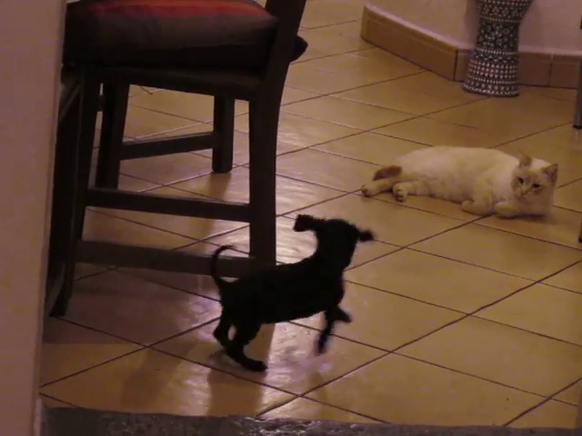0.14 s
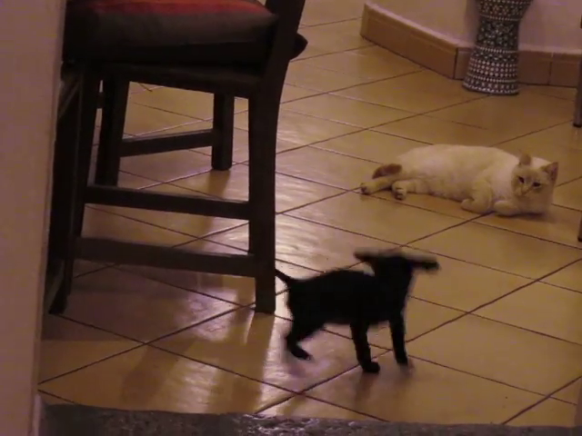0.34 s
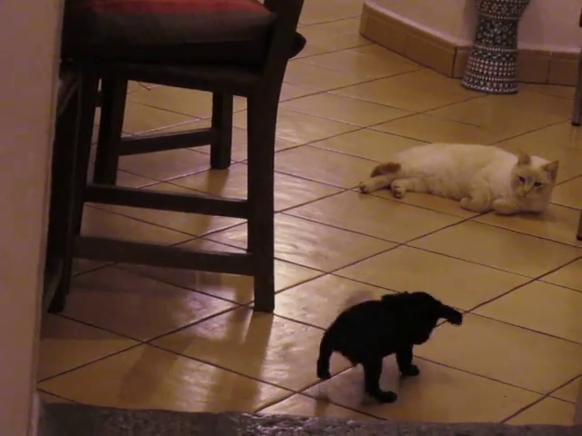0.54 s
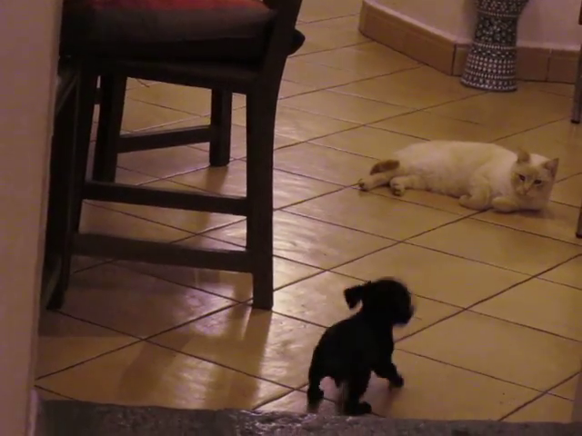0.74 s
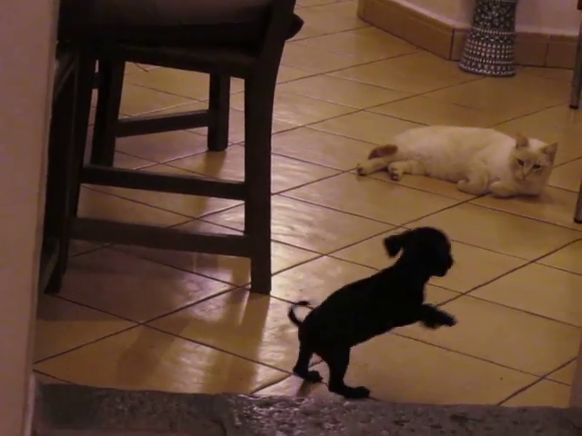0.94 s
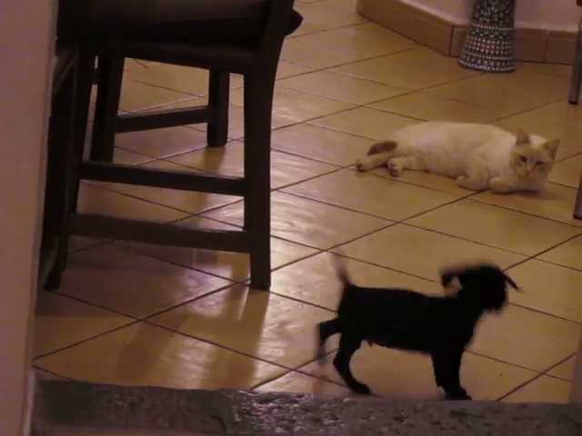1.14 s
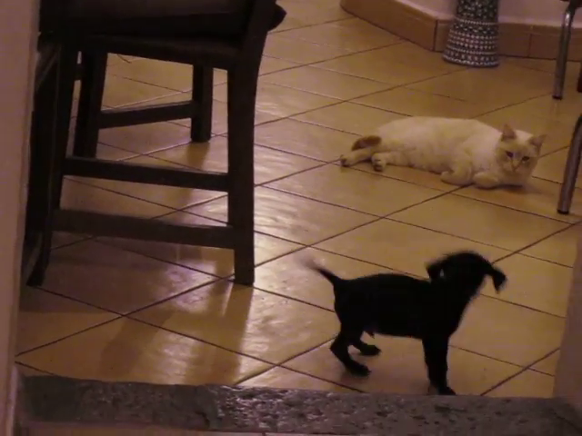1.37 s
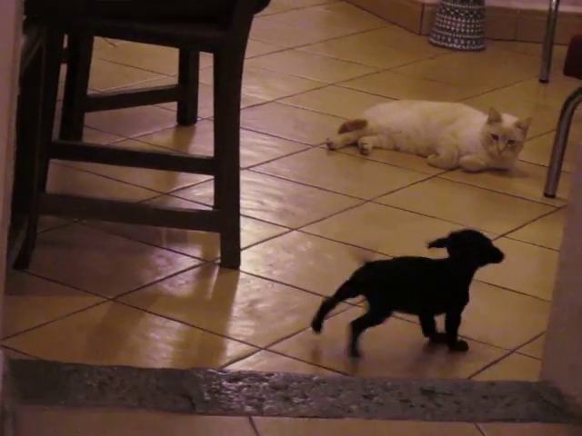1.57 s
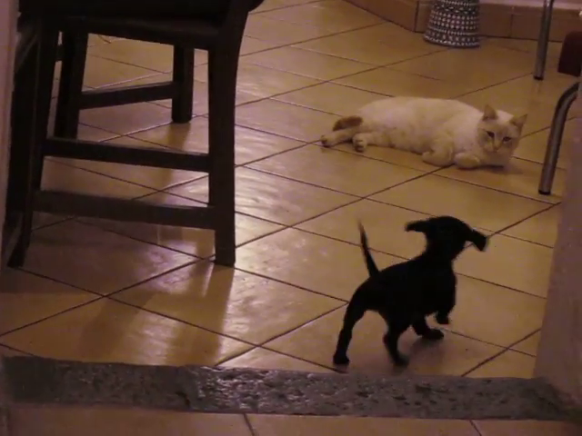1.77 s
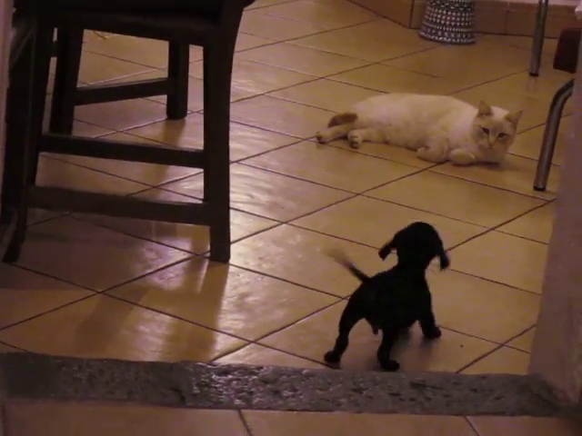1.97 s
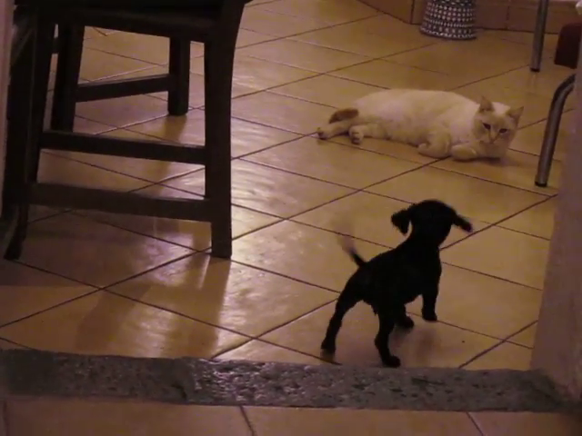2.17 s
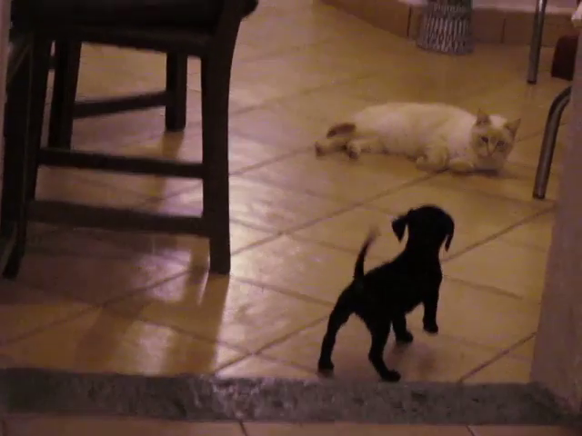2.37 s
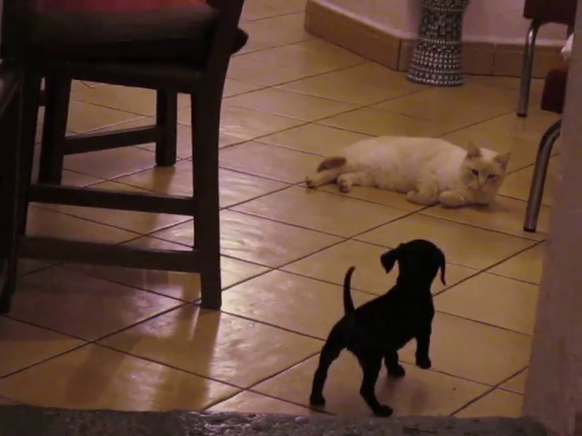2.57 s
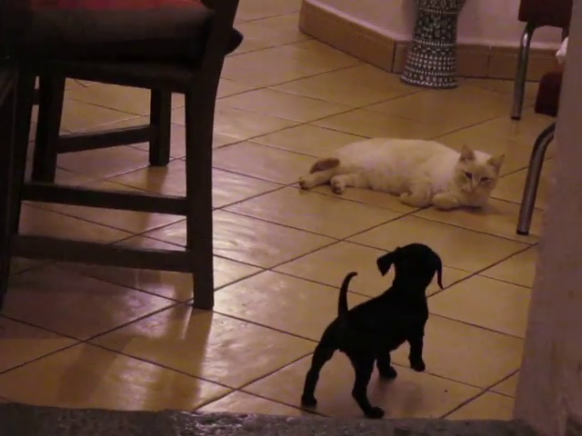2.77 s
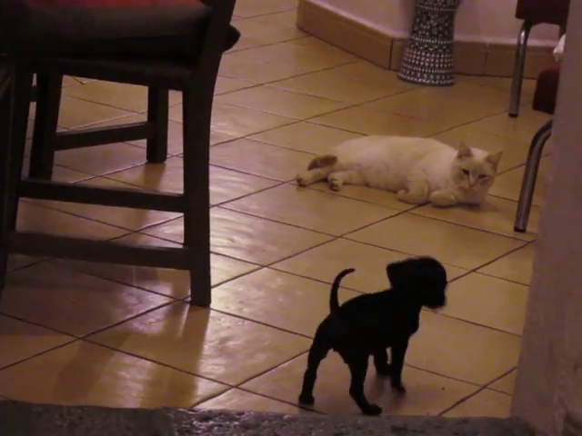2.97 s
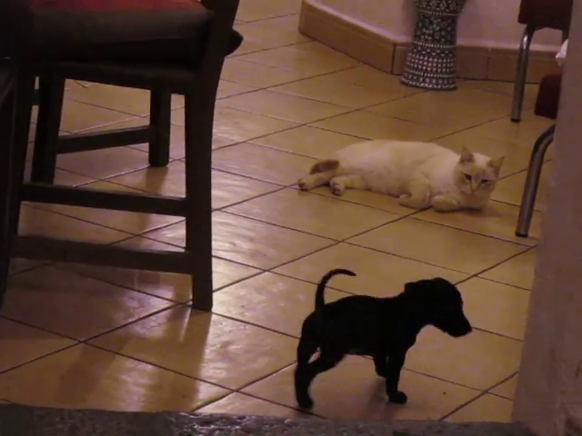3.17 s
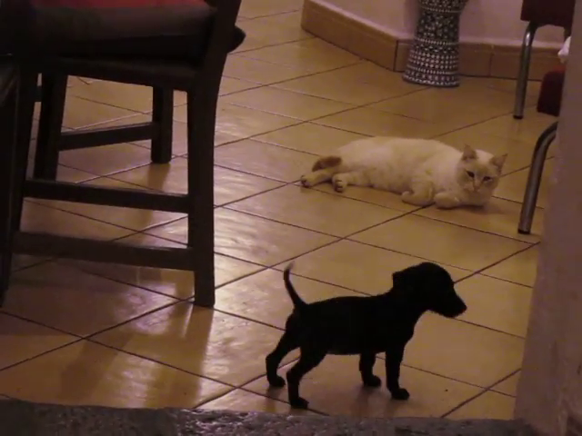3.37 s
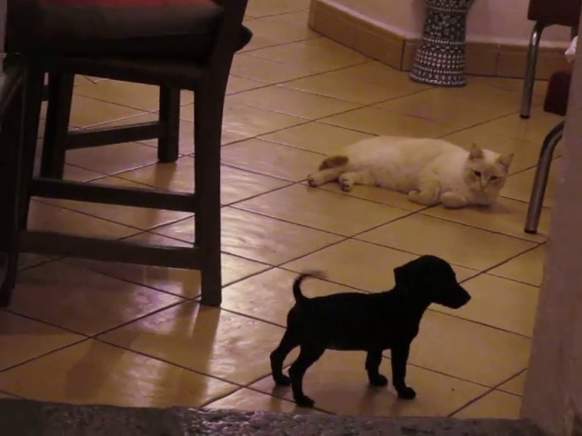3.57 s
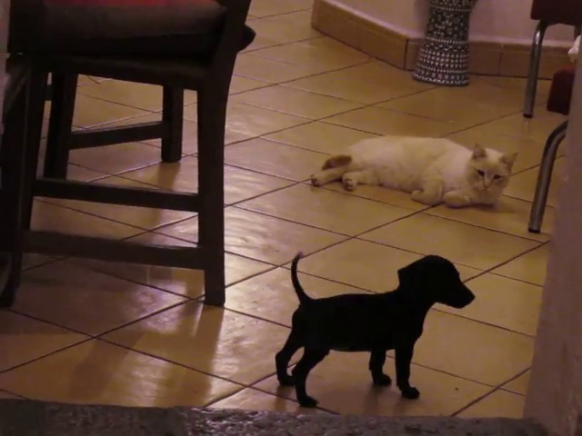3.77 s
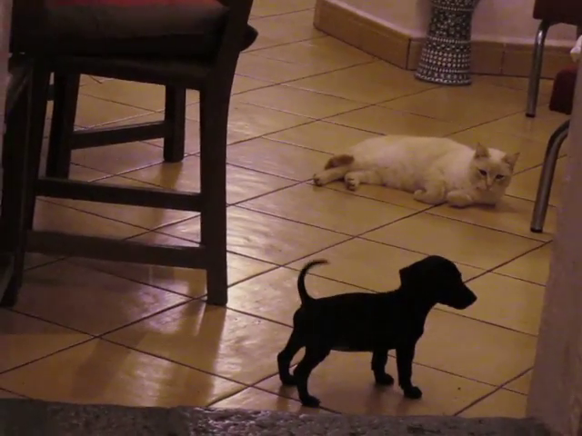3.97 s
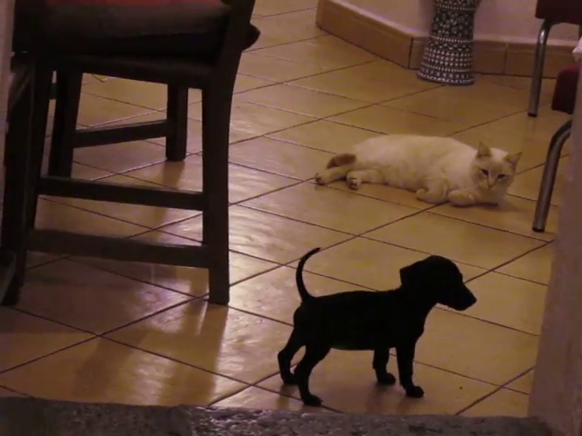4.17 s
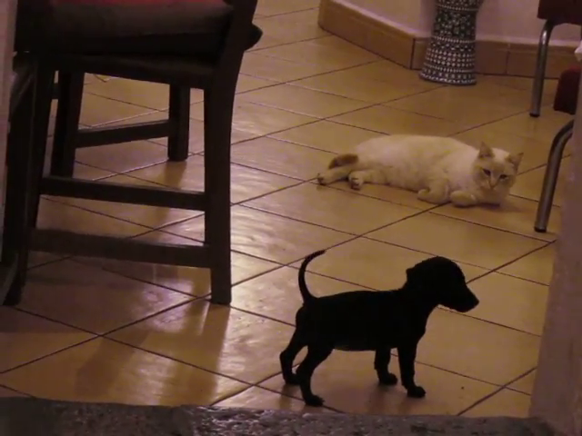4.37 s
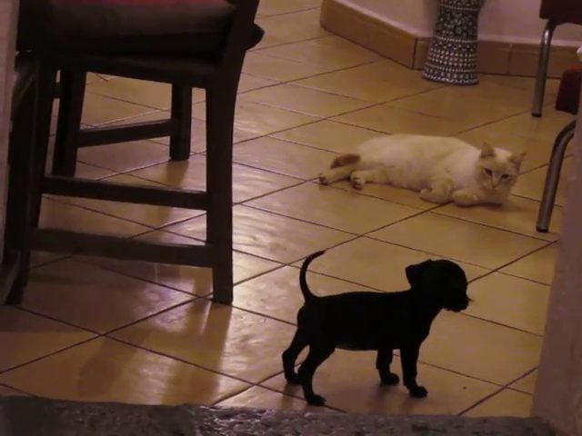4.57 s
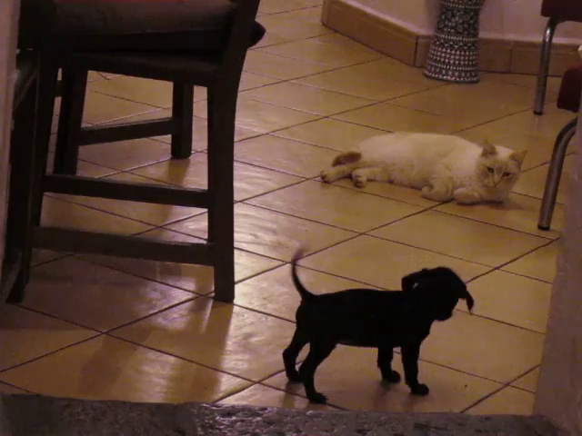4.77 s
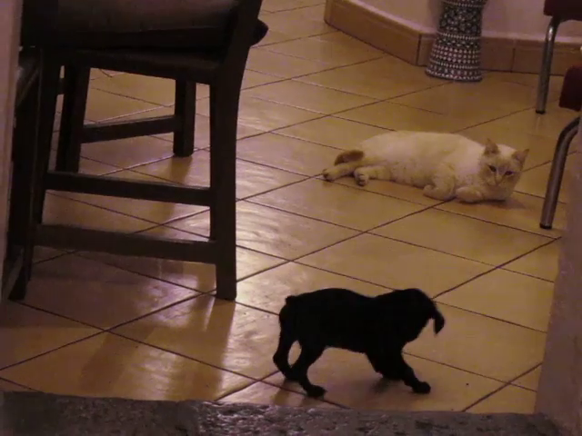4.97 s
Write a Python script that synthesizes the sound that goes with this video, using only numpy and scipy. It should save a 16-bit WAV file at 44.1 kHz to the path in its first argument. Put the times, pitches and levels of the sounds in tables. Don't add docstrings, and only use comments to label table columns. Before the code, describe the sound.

A small puppy growls and gives three sharp, squeaky yaps in an echoing tiled room, then growls low and quietly, with hiss behind.

```python
import sys
import numpy as np
from scipy import signal
from scipy.fft import rfft, irfft
from scipy.io import wavfile
from scipy.ndimage import uniform_filter1d, map_coordinates

SR = 44100
rng = np.random.default_rng(int(sys.argv[2]) if len(sys.argv) > 2 else 0)


def field_ratio(decibels):
    return 10 ** (np.asarray(decibels, dtype=float) / 20)


def persist_wave(psi):
    counts = np.round(np.clip(psi, -1, 1) * 32767).astype(np.int16)
    wavfile.write(sys.argv[1], SR, np.atleast_2d(counts).T)


N = 220913

# (f/Hz, level/dB)
MUZZLE_TONE = [(80, -45), (150, -16), (230, -9), (380, -2), (600, 0), (800, -12), (950, -13), (1100, -22),
               (1400, -15), (1750, -34), (3000, -45), (7500, -40), (12000, -55)]


def unit(x):
    return x / np.sqrt(np.mean(x ** 2) + 1e-20)


def along(points, hz):
    f, v = np.transpose(points)
    return np.interp(np.log(hz + 1), np.log(f + 1), v)


def curves(rows):
    s, *columns = np.transpose(rows)
    return [np.interp(np.arange(N) / SR, s, column) for column in columns]


def wobble(rate):
    knots = rng.standard_normal(int(N * rate / SR) + 4)
    return map_coordinates(knots, [np.arange(N) * rate / SR])


def colour(x, spectrum):
    size = 4096
    cepstrum = irfft(np.log(field_ratio(along(spectrum, np.fft.rfftfreq(size, 1 / SR)))), size)
    cepstrum[1:size // 2] *= 2
    cepstrum[size // 2 + 1:] = 0
    kernel = irfft(np.exp(rfft(cepstrum)), size)
    return signal.fftconvolve(x, kernel / np.linalg.norm(kernel))[:len(x)]


def noise(spectrum):
    return unit(colour(rng.standard_normal(N), spectrum))


def room(x, wet_db):
    # (f/Hz, t60/s)
    decay = [(200, 0.56), (500, 0.81), (1100, 0.76), (2300, 0.67), (5000, 0.6), (9000, .56), (12000, .52),
             (15000, 0.45)]
    hz, t, bins = signal.stft(rng.standard_normal(SR), SR, nperseg=256)
    fading = bins * field_ratio(-60 * t / along(decay, hz)[:, None])
    tail = signal.istft(fading, SR, nperseg=256)[1]
    tail *= np.clip(np.arange(len(tail)) / SR / 0.0076 - .3, 0, 1)
    answer = field_ratio(wet_db) * tail / np.linalg.norm(tail)
    answer[0] += 1
    answer[round(.0011 * SR)] += .4
    return signal.fftconvolve(x, answer)[:N]


def snort():
    # (f/Hz, level/dB per Hz)
    throat_tone = [(88, -20), (150, -10), (398, -0.5), (574, -3.5), (770, -2.5), (975, -12.5),
                   (2500, -20.5), (3250, -63), (5500, -120)]
    # (f/Hz, level/dB per Hz)
    nostril_tone = [(1470, -50.5), (2500, -19.5), (4010, -12), (4500, -10), (5160, -13), (8290, -6.5),
                    (10200, -17), (15500, -31)]
    t = np.arange(N) / SR
    throat_db = -37.5 - 111 * t + wobble(62)
    nose_db = -39.5 - 135 * t + 2.1 * wobble(72)
    return field_ratio(throat_db) * noise(throat_tone) + field_ratio(nose_db) * noise(nostril_tone)


def background():
    # (f/Hz, level/dB per Hz)
    hiss_tone = [(41, -30), (75, -5), (123, -5), (165, -5.5), (248, -2.5), (400, -10), (770, -9.5),
                 (1400, -13), (3000, -17), (5700, -21), (8500, -19), (10500, -25.5), (13000, -30.5),
                 (15600, -32.5)]
    # (f/Hz, level/dB per Hz)
    grip_tone = [(15, -30), (28, -11), (40, 0), (52, -4), (62, -15), (85, -19), (200, -55), (500, -110)]
    # (f/Hz, width/Hz, level/dB)
    whines = [(7780, 34, -73), (2505, 110, -71), (247.9, 43, -81.5)]
    # (t/s, half length/s, depth/dB)
    lulls = [(.9, .12, 4), (1.655, 0.29, 17), (2.7, 0.32, 2.5)]
    t = np.arange(N) / SR

    lines = np.zeros(N)
    for hz, width, db in whines:
        resonator = signal.iirpeak(hz, hz / width, SR)
        lines += field_ratio(db) * unit(signal.lfilter(*resonator, rng.standard_normal(N)))

    hum_db = -62.5 - 64 * np.abs(t - np.clip(t, 3.644, 4.3))
    hum_phase = 2 * np.pi * np.cumsum(121 + 7 * wobble(15)) / SR
    hum = field_ratio(hum_db + 2.36 * wobble(8)) * np.sin(hum_phase)

    lumps = field_ratio(1.5 * wobble(6))
    lull_db = sum(db * np.clip(1 - np.abs(t - s) / half, 0, 1) for s, half, db in lulls)
    rumble = field_ratio(-55.5 - lull_db) * lumps * noise(grip_tone)
    return field_ratio(-56.5) * noise(hiss_tone) + lines + hum + rumble


def claws():
    # (t/s, level/dB, centre f/Hz, t60/s)
    scratches = [(.355, -55, 1870, .02), (0.404, -53, 10000, .03), (.602, -46.5, 9550, 0.021),
                 (0.641, -55.5, 8480, 0.2), (.69, -54, 8310, .15), (1.735, -65, 10930, .01),
                 (3.225, -52, 9100, 0.013), (4.15, -57, 700, 0.016)]
    out, t = np.zeros(N), np.arange(SR // 10) / SR
    for s, db, hz, t60 in scratches:
        band = [(hz / 3, -30), (hz / 1.4, -6), (hz, 0), (hz * 1.5, -7), (hz * 3, -30)]
        scratch = colour(rng.standard_normal(len(t)), band)
        out[round(s * SR):][:len(t)] += field_ratio(db - 60 * t / t60) * scratch
    return room(out, wet_db=-4)


def folds(hz, share, jitter):
    # (f/Hz, level/dB)
    pulse_tone = [(100, -30), (170, 0), (3800, 0), (5500, -6), (15000, -10)]
    share = np.clip(share, 0, 1)
    phase = 2 * np.pi * np.cumsum(hz * (1 + jitter * share * wobble(180))) / SR
    count = np.floor(15000 / hz)
    pulses = np.sin((count + .5) * phase) / (2 * np.sin(phase / 2) + 1e-9) - .5
    pulses = colour(pulses * np.sqrt(2 / count), pulse_tone)
    pulses *= field_ratio((1 + 4 * share) * wobble(320))
    breath = rng.standard_normal(N) * (1 + .6 * np.cos(phase)) * 1.3
    return np.sqrt(1 - share) * pulses + np.sqrt(share) * breath


def sounding(rows):
    t = np.arange(N) / SR
    return (t >= rows[0][0]) & (t <= rows[-1][0])


def squeals(first, last):
    # (t/s, length/s, f/Hz, level/dB, level of the octave above/dB)
    notes_table = [(0.74, .035, 538, -15, -22), (0.807, 0.055, 1151, -9, -16.5),
                   (1.452, 0.043, 1027, -15, -27), (1.448, 0.039, 1195, -14, -13),
                   (1.503, 0.05, 1167, -18, 11.5), (1.999, 0.037, 1258, -12, -27),
                   (1.998, 0.025, 1058, -11.5, -23.5), (2.044, 0.078, 1058, -24.5, 14.5)]
    out, drift = np.zeros(N), wobble(90)
    for s, length, hz, db, octave_db in notes_table:
        if first <= s <= last:
            u = np.arange(round(length * SR)) / (length * SR)
            at = slice(round(s * SR), round(s * SR) + len(u))
            pitch = hz * (1 + .015 * (u - .5)) * (1 + .022 * drift[at])
            phase = 2 * np.pi * np.cumsum(pitch) / SR
            swell = np.sin(np.pi * u) ** .7 * field_ratio(1.5 * drift[at][::-1])
            upper = np.sin(2 * phase) + field_ratio(-13) * np.sin(3 * phase)
            upper += field_ratio(-24) * np.sin(4 * phase) + field_ratio(-23) * np.sin(5 * phase)
            out[at] += field_ratio(db - 0.5) * swell * (np.sin(phase) + field_ratio(octave_db) * upper)
    return out


def yap(times, effort_db, pitch_hz, clear, jaws, loudness):
    # (f/Hz, level/dB)
    half_tone = [(120, -23.5), (300, 10), (550, 17.5), (900, -4.5), (1300, 0), (3200, -10), (4300, -4),
                 (5800, -16.5), (7000, 1), (15000, -25)]
    # (f/Hz, level/dB)
    chest_tone = [(100, -15), (200, -31), (330, 11), (600, 3), (15000, 0)]
    # (f/Hz, level/dB)
    nose_tone = [(1500, -41), (2700, 1), (4000, -1), (4900, -14.5), (5900, -7.5), (7200, -16.5),
                 (9600, -4.5), (15500, -40.5)]
    # (f/Hz, level/dB)
    palate_tone = [(6000, 1.5), (7400, 2), (8800, 1), (9600, -7), (10400, 6.5), (11500, -4), (13500, 4),
                   (15500, -4)]
    start, part, snap, peak, stop = times
    shut_db, open_db, nose_db = loudness
    parting_noise, settled_noise = clear
    break_s, settle_s = .008, .018

    effort = [(start - .004, -70), *zip(times, effort_db), (stop + .022, -60)]
    db, = curves(effort)
    pitch_times = [start, snap - break_s / 2, snap + break_s / 2, peak, stop]
    hz, = curves(list(zip(pitch_times, pitch_hz)))
    share, = curves([(start, .68), (part, parting_noise), (snap - break_s, parting_noise), (snap, .8),
                     (snap + settle_s, settled_noise), (peak, settled_noise), (peak + settle_s, .58)])
    shake, = curves([(part, .16), (snap, .04)])
    source = field_ratio(db) * sounding(effort) * folds(hz, share, jitter=shake)

    opening, = curves([(part, 0), (snap + .008, 1)])
    shut = np.clip(1 - 2 * opening, 0, 1)
    wide = np.clip(2 * opening - 1, 0, 1) ** 1.2
    nose, = curves([(start, .1), (start + .029, 1)])
    chest, = curves([(part, 1), (snap - break_s, .5), (snap, 0)])

    muffled = field_ratio(shut_db) * colour(source * chest, MUZZLE_TONE)
    nasal = field_ratio(nose_db) * colour(source * shut * nose, nose_tone)
    half = colour(source * np.clip(1 - shut - wide, 0, 1), half_tone)
    mouth = half + colour(source * wide, chest_tone)
    bright = field_ratio(open_db) * colour(colour(mouth, jaws), palate_tone)
    return muffled + nasal + bright + squeals(start, stop)


def grunts():
    # (t/s, level/dB)
    catches = [
        (1.349, -46.5),
        (1.914, -43.5),
    ]
    t = np.arange(N) / SR
    envelope = sum((t >= s) * field_ratio(db - 60 * np.abs(t - s) / .19) for s, db in catches)
    return colour(envelope * folds(np.full(N, 255), .7, jitter=.07), MUZZLE_TONE)


def growl(rows):
    # (f/Hz, level/dB)
    shut_tone = [(80, -71.5), (150, 0), (250, 1), (380, 4), (540, 5.5), (800, -24.5), (1100, -40),
                 (1500, -50), (1900, -58), (3000, -37), (4200, -67), (8000, -30.5), (12000, -56)]
    # (f/Hz, level/dB)
    ajar_tone = [(100, -21), (250, -4.5), (550, -3), (900, -17), (1250, -26), (1600, -16.5), (2000, -33.5),
                 (2500, -35.5), (3200, -56), (4000, -33.5), (5000, -43), (12000, -106)]
    hz, db, opening = curves(rows)
    opening = np.clip(opening, 0, 1)
    share = np.clip(.34 + .025 * (-41 - db), .25, .75)
    source = field_ratio(db) * sounding(rows) * folds(hz, share, jitter=.2)
    return colour(source * (1 - opening), shut_tone) + colour(source * opening, ajar_tone)


def puppy():
    # (growl starts t/s, jaws part t/s, voice breaks upward t/s, peak t/s, breath runs out t/s)
    moments = [
        (.494, .72, .783, .81, .875),
        (1.372, 1.432, 1.443, 1.494, 1.55),
        (1.94, 1.958, 1.995, 2.038, 2.1),
    ]
    # (level/dB, level/dB, level/dB, level/dB, level/dB)
    efforts = [(-34, -33, -21.5, -19.5, -27), (-41, -31, -23, -19, -31), (-54, -43, -27.5, -19.5, -28)]
    # (start f/Hz, before the break f/Hz, after it f/Hz, peak f/Hz, end f/Hz)
    pitches = [(198, 285, 745, 680, 685), (250, 290, 635, 745, 630), (235, 290, 625, 680, 690)]
    clarity = [(.62, .3), (.4, .14), (.38, .32)]
    # (f/Hz, level/dB)
    open_tones = [
        [(250, -28), (850, -20), (1150, -3), (1380, -13), (1750, -16.5), (2100, -13.5), (2750, -11),
         (3450, -13), (4350, -22.5), (5650, -16), (6800, -35.5), (8300, -31.5), (10500, -38.5), (15500, -50.5)],
        [(250, -22), (700, -24), (1050, 1.5), (1400, -14), (1750, -14), (2150, -10), (2850, -10.5),
         (3600, -10.5), (4250, -20), (5700, -15), (7000, -42), (8500, -29), (10500, -39.5), (15500, -53)],
        [(300, -29.5), (680, -22.5), (900, -9), (1340, -16.5), (1700, -9.5), (2050, -21.5), (2700, -12.5),
         (3350, -15), (4100, -29), (5200, -19), (6700, -41), (8100, -31.5), (10000, -45), (15500, -50)],
    ]
    # (jaws shut level/dB, jaws open level/dB, nose hiss level/dB)
    levels = [(-7, 2.5, -51), (1.5, 2.5, -12.5), (6, 0, -11.5)]
    # (t/s, pitch f/Hz, level/dB, lip opening/0-1)
    growl_tables = [
        [(2.818, 172.4, -80, 0.18), (2.826, 171.3, -44.5, 0.26), (2.92, 169.4, -49.5, .3),
         (3.07, 169.1, -46, .2), (3.22, 180.8, -43, 0.33), (3.36, 177.7, -48.5, 0.15),
         (3.45, 260.5, -50.5, 0.17), (3.54, 209.3, -57.5, .2), (3.6, 216, -83.5, 0.27)],
        [(4.58, 229.9, -68, 0), (4.73, 197, -52, 0), (4.77, 214.7, -48, 0.38), (4.81, 256.1, -38, 0.27),
         (4.855, 309.9, -40.5, 1), (4.885, 290.2, -37, 0.8), (4.9, 255, -38.5, 0.68), (4.95, 247.6, -40, 0.7),
         (5.01, 246.6, -38, 0.47)],
    ]
    calls = zip(moments, efforts, pitches, clarity, open_tones, levels)
    yaps = sum(room(yap(*call), wet_db=-2.5) for call in calls)
    growls = sum(room(growl(rows), wet_db=-6) for rows in growl_tables)
    return yaps + growls + room(grunts(), wet_db=-4)


def scene():
    return (snort() + background() + claws() + puppy())[None]


def top_cut(x):
    return signal.sosfilt(signal.butter(12, 15690, fs=SR, output="sos"), x)


def record(dry):
    level_db = 10 * np.log10(np.abs(uniform_filter1d(dry[0] ** 2, 900)) + 1e-12)
    ramp_db = 3.3 * np.arange(N) / SR
    wanted_db = .33 * np.clip(level_db + 33, 0, None)
    cut_db = np.maximum.accumulate(wanted_db + ramp_db) - ramp_db
    return top_cut(dry * field_ratio(-uniform_filter1d(cut_db, 400)))


dry = scene()
out = record(dry)
persist_wave(out)
```